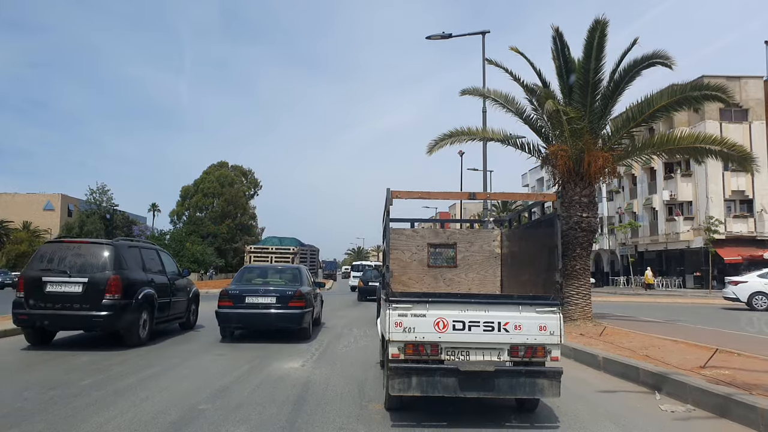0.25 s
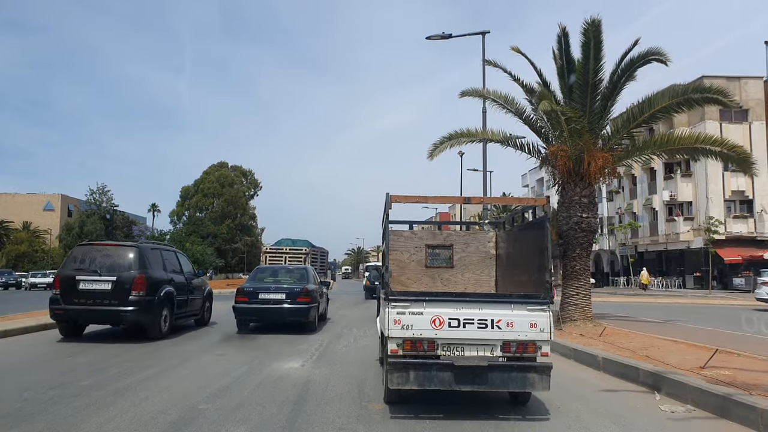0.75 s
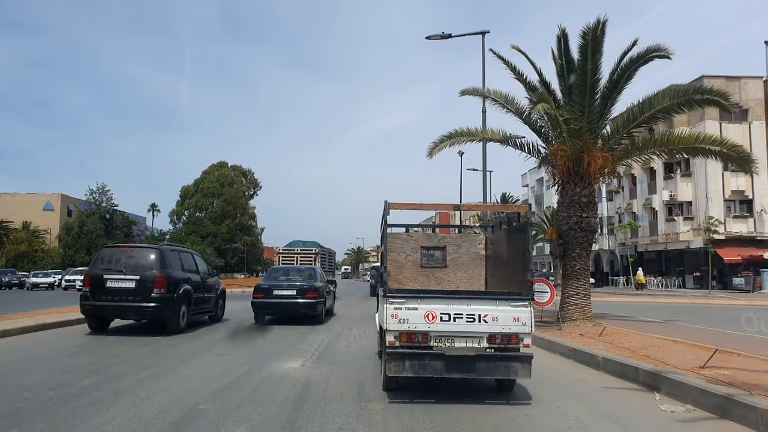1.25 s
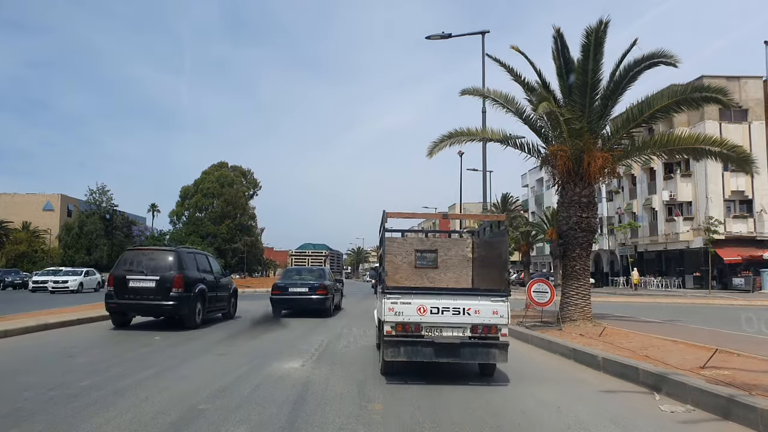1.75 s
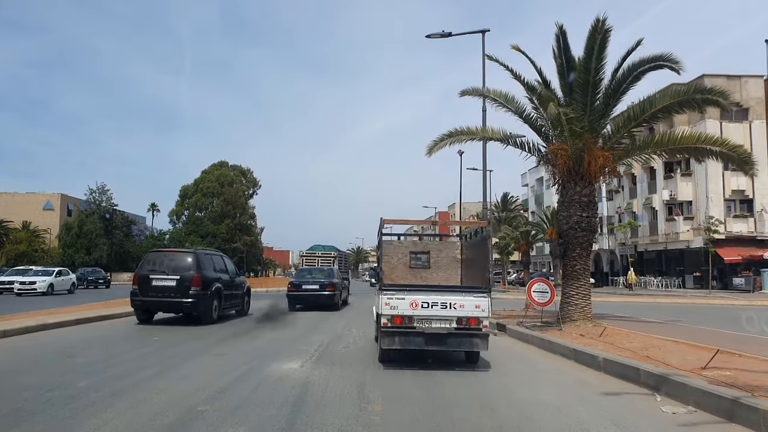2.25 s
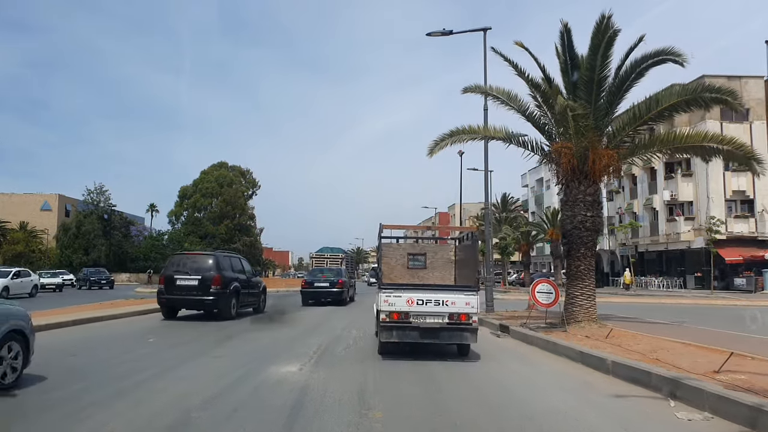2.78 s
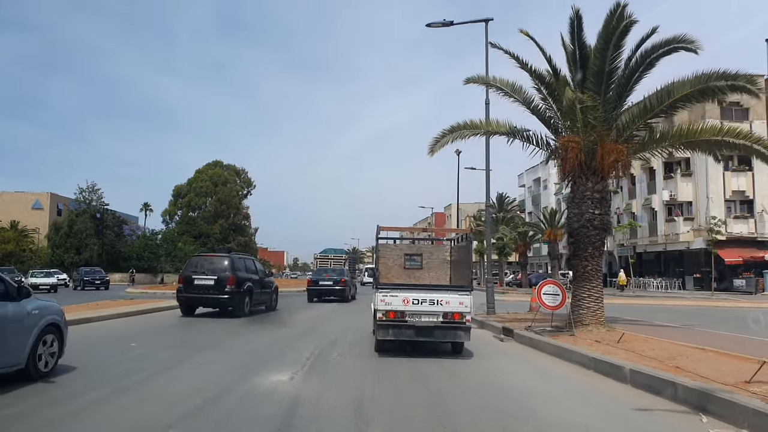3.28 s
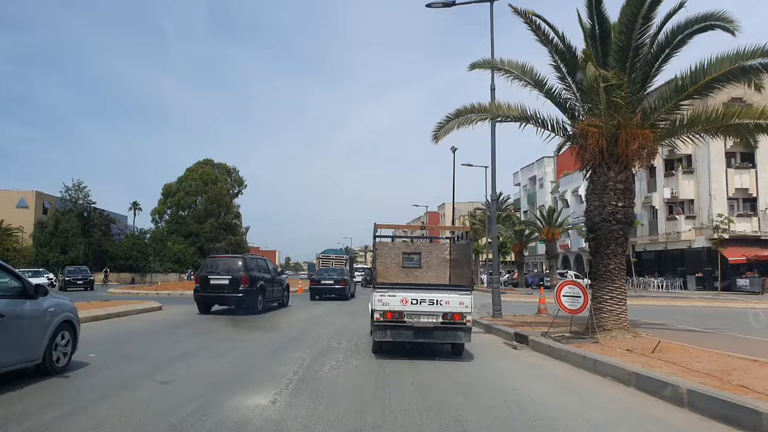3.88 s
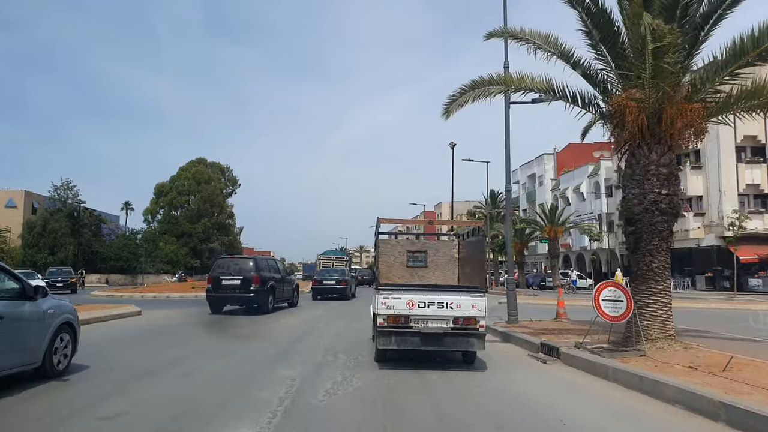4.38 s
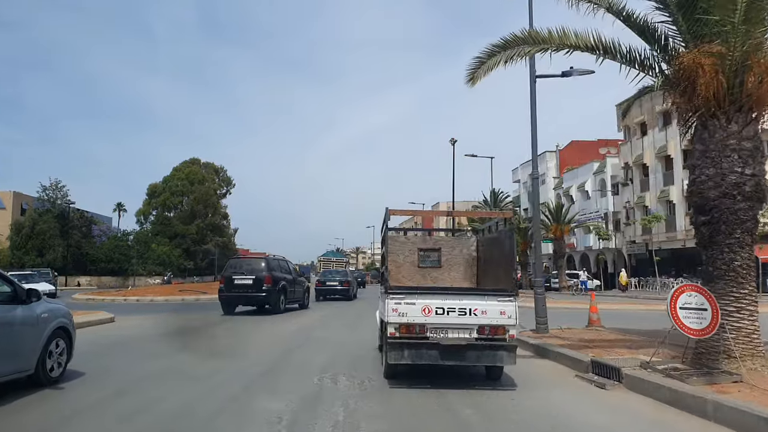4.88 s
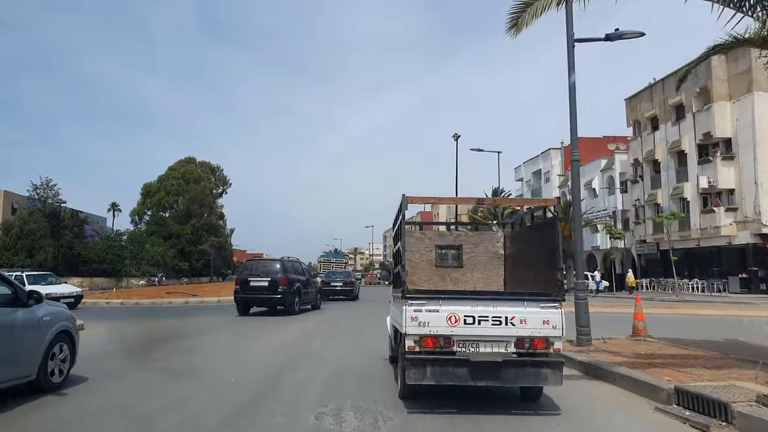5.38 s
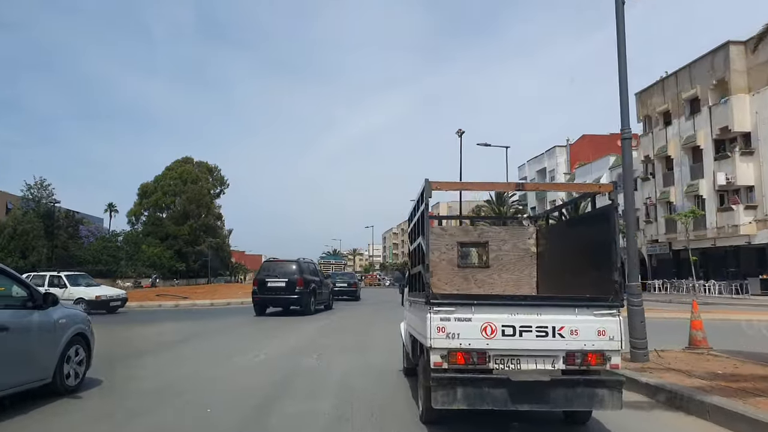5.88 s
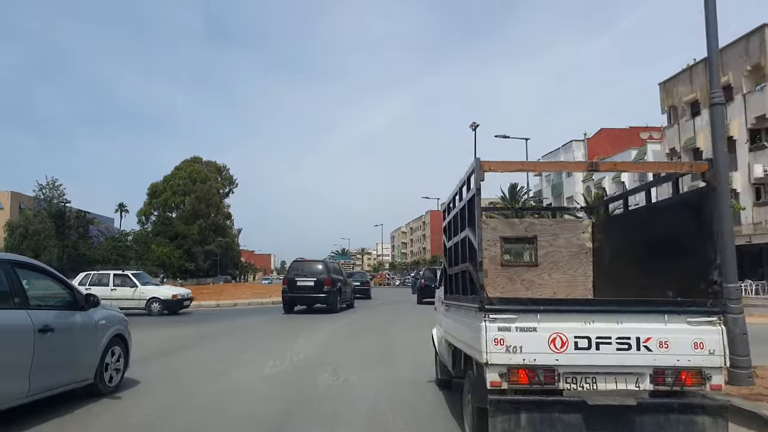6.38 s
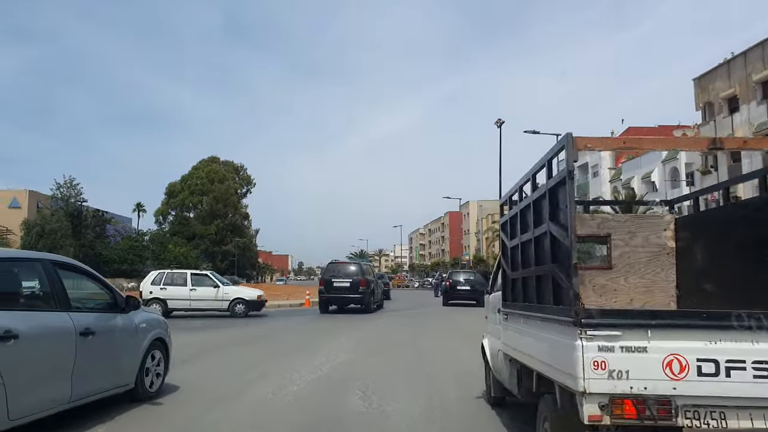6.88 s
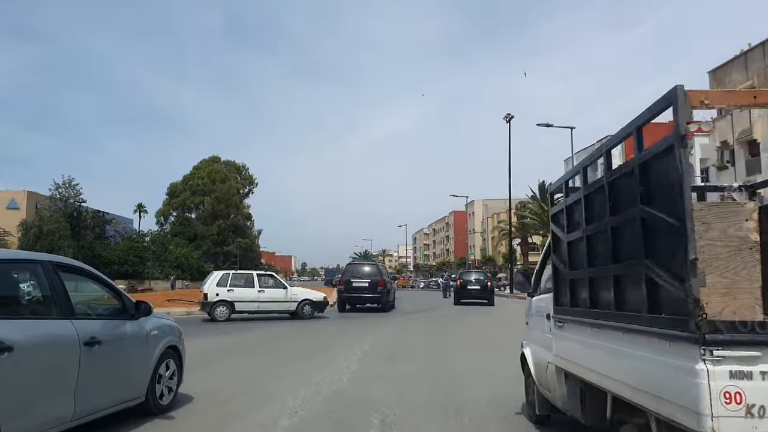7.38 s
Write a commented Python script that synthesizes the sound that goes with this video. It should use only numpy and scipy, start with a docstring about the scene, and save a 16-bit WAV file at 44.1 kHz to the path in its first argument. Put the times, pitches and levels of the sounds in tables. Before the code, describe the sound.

Heard inside a car in slow traffic: it idles while a neighbouring car and a truck throb alongside. A sudden burst of compressed air hisses nearby, then the car's engine climbs and pulls away with a low drone. Midway the left side abruptly turns thin. Bumps thud under the wheels, the cabin knocks and chirps, and very high brake squeals appear as it slows. Two phone microphone ports, left mostly louder and brighter.

```python
"""A car's engine waits, pulls away and brakes again in slow city traffic, heard in the cabin on a phone's two ports.
Sums of firing orders make this engine and the two alongside; sines ring the knocks and the bumps under the wheels.
Resonated noise makes very high brake squeals, squeaks, rubbing, chirps and whines; thin clean tones are sines.
Noise under moving spectra makes traffic wash, road rumble, tyre hiss and one nearby burst of compressed air.
Part way through, traffic, engines, whines and thin tones abruptly lose bass and mids at the left port."""
import sys
import numpy as np
from scipy import signal
from scipy.fft import rfft, irfft
from scipy.io import wavfile
from scipy.ndimage import uniform_filter1d

SR = 44100
rng = np.random.default_rng(int(sys.argv[2]) if len(sys.argv) > 2 else 0)


def dump_mix(stems):
    """Bounce the given channels to the path in sys.argv[1] as a 16-bit WAV at rate SR."""
    frames = np.atleast_2d(stems).T  # one column per channel
    limited = np.clip(frames, -1, 1)  # hard clip at full scale
    pcm = np.round(limited * 32767).astype(np.int16)
    wavfile.write(sys.argv[1], SR, pcm)


N = 337358  # samples
EDGE_HZ = 15700  # upper band limit

# Bumps under the wheels. Each row: start in seconds, level in dB, pitch in Hz.
BUMPS = [(4.506, -34, 69), (4.598, -34, 64.6), (4.777, -24, 64), (4.848, -17.5, 65.7), (4.919, -21.5, 85),
         (4.979, -25.5, 77), (5.061, -21.5, 79.6), (5.119, -20, 83.6), (5.22, -21.5, 83.3),
         (5.271, -23.5, 75.3), (5.335, -23, 69), (5.478, -18.5, 69.4), (5.629, -23, 80.4),
         (5.695, -30.5, 68), (5.943, -24, 84.7), (6.064, -17.5, 81), (6.249, -20, 82.3), (6.375, -20.5, 79),
         (6.598, -22, 98), (6.746, -16.5, 88), (6.863, -24, 78), (6.963, -29.5, 80.7), (7.086, -22, 82.6),
         (7.202, -20.5, 70), (7.318, -20, 91.5), (7.395, -27.5, 64), (7.47, -22.5, 77)]


def amp(db):
    """Decibels to gain."""
    return 10 ** (np.asarray(db) / 20)


def evened(x):
    """Scales to rms 1."""
    return x / np.sqrt(np.mean(x ** 2) + 1e-20)


def read(points, hz):
    """Reads every column of a spectrum table on a log-frequency axis."""
    table_hz, *columns = np.transpose(points)
    return np.array([np.interp(np.log(hz + 1), np.log(table_hz + 1), column) for column in columns])


def shaped(points, hz, lift_db=0):
    """Power spectrum at each port, mean 1 over both."""
    power = amp(read(points, hz) + lift_db) ** 2
    return (power / power.mean())[..., None]


def played(rows):
    """First sample of a curve table, and its columns at every sample."""
    s, *columns = np.transpose(rows)
    first = round(s[0] * SR)
    t = np.arange(first, min(round(s[-1] * SR), N)) / SR
    return first, [np.interp(t, s, column) for column in columns]


def arch(start, length, peak_db, ends_db):
    """First sample, progress 0-1, and a level that lies ends_db under its peak at both ends."""
    progress = np.linspace(0, 1, round(min(length, N / SR - start) * SR))
    return round(start * SR), progress, peak_db - ends_db * (2 * progress - 1) ** 2


def add(mix, at, sound):
    """Mixes a two-channel sound in from sample at."""
    mix[:, at:at + sound.shape[1]] += sound[:, :N - at]


def panned(x, pan_db):
    """Splits a sound over the ports; pan_db is left minus right."""
    return np.array([x * amp(pan_db / 2), x / amp(pan_db / 2)])


def wander(count, width_s):
    """Slow random drift of rms 1: noise through two running means."""
    width = int(width_s * SR)
    once = uniform_filter1d(rng.standard_normal(count), width)
    return evened(uniform_filter1d(once, width))


def resonate(x, hz, width):
    """A resonance at a fixed or moving pitch: shifts hz down to zero, smooths twice, shifts back."""
    turn = np.exp(2j * np.pi * np.cumsum(hz * np.ones(len(x))) / SR)
    r = np.exp(-np.pi * width / SR)
    smooth = signal.lfilter([(1 - r) ** 2], [1, -2 * r, r * r], x / turn)
    return 2 * (turn * smooth).real


def pair(count, same):
    """White noise at two ports, partly alike."""
    a, b = rng.standard_normal((2, count))
    return np.array([a, same * a + np.sqrt(1 - same ** 2) * b])


def whistle(hz, db, pan_db, width_hz, flutter_db, overtone_db=None):
    """Irregular slips ring a narrow resonance: a fuzzy, fluttering whistle, only partly alike at the ports."""
    slips = pair(len(db), 0.51)
    ring = np.array([evened(resonate(x, hz, width_hz)) for x in slips])
    if overtone_db is not None:
        high_hz = np.minimum(2 * hz, EDGE_HZ)
        overtone = np.array([evened(resonate(x, high_hz, 2 * width_hz)) for x in slips])
        ring += amp(overtone_db) * (2 * hz < EDGE_HZ) * overtone  # silent above the band limit
    shape = amp(db + flutter_db * wander(len(db), 0.0071)) * signal.windows.tukey(len(db), .1)
    return ring * panned(shape, pan_db)


def engine(rows, orders, uneven_db, uneven_s):
    """Sines at orders of the firing rate; uneven burning makes each one flutter."""
    at, (hz, load_db) = played(rows)
    turns = np.cumsum(hz) / SR
    out = 0
    for k, left_db, right_db in orders:
        order = amp(uneven_db * wander(len(hz), uneven_s)) * np.sin(2 * np.pi * k * turns)
        out = out + amp([[left_db], [right_db]]) * order
    fade_out = np.minimum(np.arange(len(hz), 0, -1) / (.1 * SR), 1)
    return at, np.sqrt(2) * amp(load_db) * out * fade_out


def own_engine():
    """The cabin's own engine, its firing rate rising to pull away and falling again."""
    # Each row: time in seconds, firing rate in Hz, load in dB.
    run = [(0, 27.5, -42), (1, 27, -34), (1.95, 27, -36.5), (2.1, 29, -26), (2.25, 41, -27.5),
           (2.35, 54, -30), (2.48, 59.5, -31), (2.68, 60.5, -23.5), (2.93, 60.5, -25.5), (3.1, 57.5, -26.5),
           (3.77, 58, -27), (3.92, 59, -27), (4.17, 58.5, -24.5), (4.35, 57.5, -27), (4.65, 61, -30),
           (4.85, 57, -28.5), (5.2, 40.5, -34.5), (5.6, 29.5, -29), (7.65, 25.5, -40)]
    # Each row: multiple of the firing rate, left and right level in dB relative to the load.
    orders = [(.5, -26, -43), (1, 0.5, -5.5), (2, -16, -8), (2.5, -24, -33), (3, -5.5, -21.5),
              (3.5, -17, -39.5), (4, -12, -28), (6, -24, -36.5), (9.5, -33, -39.5)]
    return engine(run, orders, uneven_db=0.28, uneven_s=0.068)


def left_car():
    """An engine alongside, stronger at the left port, that beats against the own engine."""
    # Each row: time in seconds, firing rate in Hz, load in dB.
    run = [(0, 57, -23), (.2, 55.6, -19.5), (.5, 53.5, -30), (.9, 50.47, -24.5), (1.3, 51.3, -20),
           (1.55, 50.9, -25), (1.8, 52.6, -15), (2.1, 52.53, -21), (2.4, 53.31, -16.5), (3, 53.42, -21),
           (3.2, 54.26, -16.5), (3.5, 54.62, -22), (3.75, 53.18, -17.5), (4.3, 55.01, -21),
           (4.6, 57.5, -60.5)]
    # Each row: multiple of the firing rate, left and right level in dB relative to the load.
    orders = [(1, 0.5, -15.5), (2, -16, -31.5)]
    return engine(run, orders, uneven_db=1.72, uneven_s=0.05)


def truck():
    """A truck engine alongside, with many orders and a slower flutter."""
    # Each row: time in seconds, firing rate in Hz, load in dB.
    run = [(0, 38.44, -38.5), (.45, 39.04, -35.5), (.9, 39.43, -36), (1.4, 40.36, -37.5),
           (1.75, 39.44, -36), (2.1, 38.9, -31.5), (2.35, 37.97, -40.5), (2.7, 37.54, -46)]
    # Each row: multiple of the firing rate, left and right level in dB relative to the load.
    orders = [(2, -1, -15.5), (3, 2, -18), (4, -10.5, -17), (5, -0.5, -19), (6, -2.5, -22), (7, -20.5, -31),
              (8, -11.5, -30), (9, -14.5, -36), (10, -14.5, -32), (11, -19.5, -29), (12, -12.5, -25)]
    return engine(run, orders, uneven_db=2.5, uneven_s=0.24)


def squeal(disc, start, held, catch_db, last_db, fade):
    """Pad and disc slip against each other and excite one disc mode."""
    hz, width_hz, pan_db, flutter_db = disc
    catch_s, gone_db = 0.019, 35  # the pad bites this fast; it rises and fades by gone_db
    at, (db,) = played([(start, catch_db - gone_db),
                        (start + catch_s, catch_db),
                        (start + held, last_db),
                        (start + held + gone_db / fade, last_db - gone_db)])
    db = db[max(-at, 0):]  # drop what lies before time zero
    db = db + 1.5 * wander(len(db), 0.035)  # stutter
    return max(at, 0), whistle(hz, db, pan_db, width_hz, flutter_db)


def knock(s, db, hz, t60, pan_db):
    """A dying ring that starts within a cycle or two, roughened by rattle."""
    t = np.arange(12000) / SR
    rattle = evened(resonate(rng.standard_normal(len(t)), hz, 0.4 * hz))
    decay = amp(db - 60 * t / t60)
    onset = 1 - np.exp(-t * hz / 0.79)
    ring = decay * onset * (np.sin(2 * np.pi * hz * t) + 0.33 * rattle)
    return round(s * SR), panned(ring, pan_db)


def bump(s, db, hz):
    """A low knock under the wheels, nearly even at the two ports."""
    return knock(s, db, hz, t60=0.22, pan_db=1.5)


def squeak(rows):
    """A rough, broken whistle with an overtone, whose pitch wobbles around its slide."""
    at, (hz, db) = played(rows)
    hz = hz * (1 + .025 * wander(len(hz), 0.01))
    return at, whistle(hz, db, pan_db=9, width_hz=.055 * hz.mean(), flutter_db=2.5, overtone_db=-5)


def rub(start, length, level_db, pan_db):
    """Grainy slips ring a few broad resonances that shift unevenly."""
    # Each row: resonance in Hz before it shifts, width in Hz, relative level in dB.
    ring_rows = [(2670, 300, 0), (2900, 230, -4.5), (4300, 590, -8.5)]
    at, progress, db = arch(start, length, level_db, ends_db=9)
    slips = rng.standard_normal(len(db)) * amp(2.5 * wander(len(db), 0.003))
    rise = 1 + 0.04 * (progress - .5) + 0.025 * wander(len(db), .04)
    rings = sum(amp(ring_db) * evened(resonate(slips, hz * rise, width)) for hz, width, ring_db in ring_rows)
    return at, panned(amp(db) * rings * signal.windows.tukey(len(db), .3), pan_db)


def whine(start, length, first_hz, last_hz, width_hz, peak_db, pan_db):
    """A soft fuzzy whistle that swells, fades and may drift in pitch."""
    at, progress, db = arch(start, length, peak_db, ends_db=4)
    hz = first_hz + (last_hz - first_hz) * progress
    return at, whistle(hz, db, pan_db, width_hz, flutter_db=1.5)


def chirp(s, db, hz):
    """A short faint chirp of cabin trim: noise in one resonance at a steady pitch."""
    return whine(s, .035, hz, hz, width_hz=260, peak_db=db, pan_db=5)


def thin_tone(start, length, first_hz, final_hz, settle_s, peak_db, pan_db):
    """A sine of slightly wavering level that settles on its pitch, as gears whine or a brake sings."""
    at, progress, db = arch(start, length, peak_db, ends_db=4)
    hz = final_hz + (first_hz - final_hz) * np.exp(-progress * length / settle_s)
    sine = np.sqrt(2) * np.sin(2 * np.pi * np.cumsum(hz) / SR)
    sine = sine * signal.windows.tukey(len(progress), .1)
    return at, panned(sine * amp(db + 2.0 * wander(len(progress), .03)), pan_db)


def air(t):
    """Power of a burst of compressed air nearby: sudden, held, dying, with a weaker lingering leak."""
    start_s, held_s, shut_s = 1.575, 0.12, 2.35  # the valve shuts at shut_s
    rise, fade, leak_fade = 310, 82, 6.1  # dB per second
    since = np.maximum(t - start_s - held_s, 0)
    burst = amp(-52 - fade * since) ** 2
    leak = amp(-60 - leak_fade * since - fade * np.maximum(t - shut_s, 0)) ** 2
    return (burst + leak) / amp(rise * np.maximum(start_s - t, 0)) ** 2


def tyres(t):
    """Power of the tyre hiss: a far bed, and vehicles that swell and fade past the window."""
    # Each row: reference time in seconds, level there in dB, swell before it and fade after it
    # in dB per second (a negative fade goes on rising).
    passes = [(0, -51.5, 30, 33), (.6, -55, 3, 5), (1.699, -45.5, 33, 19.5), (4.5, -58, 11, 8),
              (6.0, -72, 11, 7), (7.3, -47.5, 10, -3)]
    power = amp(-63) ** 2  # far bed
    for s, db, swell, fade in passes:
        drop_db = np.where(t < s, swell * (s - t), fade * (t - s))
        power = power + amp(db - drop_db) ** 2
    return power


def jolts(t):
    """How hard the bumps shake the body, around its mean from the first bump on."""
    jolt_s = 0.031
    shake = sum(amp(db) * np.exp(-((t - s - jolt_s / 2) / jolt_s) ** 2) for s, db, hz in BUMPS)
    shake = shake / shake.max()
    rolling = t > BUMPS[0][0]
    return shake - shake[rolling].mean() * rolling


def street():
    """Wash, hiss, air and rumble: noise under moving spectra with drifting patches, partly alike at the ports."""
    # Spectra at the two ports. Each row: frequency in Hz, left and right relative level in dB.
    wash_spectrum = [(25, -27.5, -37), (57.7, -14, -19.5), (133, -3.5, -15.5), (169, -8.5, -23.5),
                     (237, -11.5, -23), (342, -17.5, -28.5), (455, -15, -29), (760, -24, -39),
                     (1073, -26, -36), (1220, -32.5, -42.5), (1780, -34.5, -47), (2610, -38, -58),
                     (3800, -44.5, -66.5), (6540, -67, -84), (14000, -92.5, -100)]
    hiss_spectrum = [(300, -41.5, -53), (676, -20, -42.5), (1340, -27.5, -38), (2000, -40.5, -45.5),
                     (3950, -38, -58), (5800, -44, -65), (7490, -53, -78), (8490, -43.5, -75.5),
                     (9700, -47.5, -58), (13000, -56.5, -60.5), (15500, -65, -81)]
    air_spectrum = [(1492, -36.5, -59.5), (2800, -37.5, -53.5), (4570, -39.5, -56), (6440, -42.5, -64.5),
                    (7300, -57, -74), (8400, -41, -67.5), (10200, -41, -47), (12600, -49, -59),
                    (15600, -49, -79)]
    rumble_spectrum = [(20.5, 13.5, -7.5), (41.7, 6, 6.5), (59, 12, 10), (86.8, 15.5, 13.5),
                       (111, 12.5, -5.5), (149, -1, -3), (203, -20.5, -30.5), (400, -43.5, -61.5),
                       (1500, -110, -110)]
    # Cabin resonances. Each row: frequency in Hz, width in Hz, lift in dB.
    panels = [(227, 133, 4.5), (356.3, 22.6, 5), (451.5, 7.5, 3), (653, 40, 2.5), (813, 9.5, 8),
              (1251, 9.5, 9), (1660.5, 11, 4), (2180, 150, 0), (2420, 270, 0)]
    # Likeness of the ports. Each row: frequency in Hz, left-right likeness from 0 to 1.
    likeness = [(50, 0.9), (100, 0.8), (200, 0.8), (450, 0.82), (1200, 0.48), (2000, 0.25), (5000, 0.16)]
    # Traffic wash before bass evening and shaking. Each row: time in seconds, level in dB.
    wash_level = [(0, -31.5), (.35, -34.5), (1.2, -34.5), (1.6, -29), (1.95, -31), (2.6, -36.5),
                  (4.1, -36.5), (4.6, -34.5), (5.45, -38.5), (6.2, -34), (7.1, -36.5), (7.5, -32),
                  (7.65, -35.5)]
    # Road rumble before lumps and jolts, mostly weak while the car waits. Each row: time in seconds, level in dB.
    rumble_level = [(0, -22.5), (.3, -41), (1.0, -34.5), (1.85, -53.5), (2.151, -28.5), (2.8, -42),
                    (3.5, -34), (4.25, -25), (4.55, -28), (4.9, -28.5), (5.5, -26), (6.05, -21),
                    (6.35, -30.5), (6.7, -26), (7.15, -25.5), (7.5, -20), (7.65, -29.5)]
    bass_follows, bass_hz = 0.24, 224  # well under bass_hz the wash follows its swells only by this share
    lag_s = 0.00041  # the shared sound reaches the right port later

    hz, t, (left, other) = signal.stft(rng.standard_normal((2, N)), SR, nperseg=2048, noverlap=1536)
    rows_hz = hz[:, None]
    wash = amp(np.interp(t, *np.transpose(wash_level))) ** 2
    rumble = amp(np.interp(t, *np.transpose(rumble_level))) ** 2
    wash = wash * (wash.mean() / wash) ** ((1 - bass_follows) / (1 + (rows_hz / bass_hz) ** 4))

    # Rumble and lower wash swell and sink in random lumps throughout; the bumps jolt both too.
    lumps = evened(uniform_filter1d(rng.standard_normal(len(t)), size=3))
    jolt = jolts(t)
    wash = wash * amp(1.8 * lumps / (1 + (rows_hz / 300) ** 2)) ** 2
    wash = wash * amp(5.5 * jolt / (1 + (rows_hz / 700) ** 2)) ** 2
    rumble = rumble * amp(3.68 * lumps + 8.5 * jolt) ** 2

    panels_db = sum(db / (1 + (2 * (hz - f) / width) ** 2) for f, width, db in panels)
    power = shaped(wash_spectrum, hz, panels_db) * wash
    power = power + shaped(hiss_spectrum, hz, panels_db) * tyres(t)
    power = power + shaped(air_spectrum, hz, panels_db) * air(t)
    power = power + shaped(rumble_spectrum, hz) * rumble

    patches = uniform_filter1d(rng.standard_normal(left.shape), size=30, axis=0)
    patches = evened(uniform_filter1d(patches, size=8, axis=1))
    same = read(likeness, hz)[0][:, None]
    lagged = left * np.exp(-2j * np.pi * rows_hz * lag_s)
    right = same * lagged + np.sqrt(1 - same ** 2) * other
    spectra = np.array([left, right]) * np.sqrt(power) * amp(0.9 * patches)
    return signal.istft(spectra, nperseg=2048, noverlap=1536)[1][:, :N]


def thinned(x):
    """The left port turns thin: bass and mids drop in a crossfade to a filtered copy within 23 ms."""
    # Each row: frequency in Hz, change at the left port in dB.
    thinning = [(30, -44), (55, -6), (90, -16), (250, -5.5), (700, -11), (1400, -7), (2800, -10),
                (3400, -4), (5000, -2.5)]
    start_s, turn_s = 4.2, 0.023
    gain = amp(read(thinning, np.fft.rfftfreq(N, 1 / SR))[0])
    thin = irfft(rfft(x[0]) * gain, N)
    share = np.clip((np.arange(N) / SR - start_s) / turn_s, 0, 1)
    return np.array([(1 - share) * x[0] + share * thin, x[1]])


def scene():
    """Traffic, engines, whines and tones pass the changing port; squeals, bumps and cabin noises join."""
    # Brake squeals. Each row: start in seconds, held in seconds, level in dB when it catches,
    # level in dB when it lets go, fade in dB per second.
    squeals = [(-.04, 0.072, -55, -60, 170), (.06, 0.072, -71, -56, 298.5), (5.17, 0.12, -80, -75, 251),
               (5.33, 0.49, -65, -57.5, 71), (5.94, .5, -90, -92, 151.5), (6.56, 0.6, -63, -66, 41),
               (6.902, .1, -69, -71.5, 116.5), (7.17, .12, -88, -80, 311), (7.31, .08, -79, -78, 170),
               (7.368, 0.11, -53.5, -50, 136)]
    # Disc modes, one for each squeal. Each row: pitch in Hz, width in Hz, left minus right in dB, flutter in dB.
    discs = [(11370, 70, 2, 2), (12320, 70, 6, 2), (12620, 150, 6, 3), (12860, 65, 6, 2.5),
             (14720, 70, 14, 3), (12120, 75, 4, 2.5), (11100, 40, 1, 2), (14290, 60, 12, 2),
             (14650, 60, 12, 2), (11990, 190, 4, 3)]
    # Sliding squeaks, one list each. Each row: time in seconds, pitch in Hz before wobble, level in dB.
    squeaks = [
        [(5.7, 4000, -84.5), (5.748, 4750, -66.5), (5.762, 6100, -71), (5.792, 6740, -71), (5.803, 8850, -68),
         (5.828, 8200, -70), (5.838, 9800, -67), (5.85, 10000, -77)],
        [(7.43, 6500, -74), (7.515, 7000, -74), (7.545, 6430, -69), (7.585, 5830, -69), (7.625, 5430, -64),
         (7.65, 5270, -68)],
    ]
    # Something rubs in the cabin. Each row: start in seconds, length in seconds, level in dB, left minus right in dB.
    rubs = [(5.068, 0.38, -67.5, 7), (5.8, 0.216, -67, 6)]
    # Cabin knocks. Each row: start in seconds, level in dB, pitch in Hz, 60 dB decay in seconds,
    # left minus right in dB.
    knocks = [(5.702, -53, 660, .5, 8), (5.702, -55, 1110, .12, 6), (5.714, -44, 314, .2, 5),
              (5.753, -32, 364, .047, 2), (5.754, -40, 1230, .016, 7), (5.863, -55, 1180, .08, 2),
              (5.892, -47, 420, .051, 4), (6.002, -42, 1235, .022, 6), (6.109, -50, 950, .064, 0),
              (6.158, -46, 590, .16, 5), (6.161, -53, 1220, .08, -1), (6.184, -47, 480, .13, 9),
              (6.215, -40, 393, .1, 1), (6.34, -51, 655, .087, 4), (7.388, -53.5, 1300, .03, 10),
              (7.485, -55, 1520, .05, 13)]
    # Chirps of trim in the cabin. Each row: start in seconds, level in dB, pitch in Hz.
    chirps = [(4.6, -66, 2300), (4.705, -68, 2170), (6.1, -70, 2860), (6.205, -61.5, 1750),
              (6.555, -64, 1720), (6.875, -60, 1960)]
    # Fuzzy whines and hums heard with the traffic. Each row: start in seconds, length in seconds,
    # first and last pitch in Hz, width in Hz, level in dB, left minus right in dB.
    whines = [(1.8, 1.75, 2200, 2154, 130, -67, 16.5), (2.9, 1.8, 625, 640, 50, -60, 11),
              (3.2, 1.3, 2880, 2810, 230, -71, 11.5), (3.7, 1.15, 8400, 8100, 450, -85, 21.5),
              (1.75, .5, 2850, 2650, 500, -65.5, 14), (1.56, .27, 4700, 4490, 650, -65, 17),
              (.8, .45, 252, 274, 7, -46, 8.5), (1.3, .45, 160, 160, 7, -43, 12),
              (1.35, .33, 368, 358, 8, -47.5, 14)]
    # Thin clean tones. Each row: start in seconds, length in seconds, first and final pitch in Hz,
    # settling time in seconds, level in dB, left minus right in dB.
    thin_tones = [(3.3, 1.2, 634, 642, .6, -58, 11), (3.2, 1.3, 975, 998, .6, -65, 6),
                  (6.98, .67, 5425, 5425, .5, -79, 13)]

    mix = street()
    for motor in (own_engine, left_car, truck):
        add(mix, *motor())
    for play, rows in ((whine, whines), (thin_tone, thin_tones)):
        for row in rows:
            add(mix, *play(*row))
    mix = thinned(mix)
    for disc, row in zip(discs, squeals):
        add(mix, *squeal(disc, *row))
    for rows in squeaks:
        add(mix, *squeak(rows))
    for play, rows in ((rub, rubs), (knock, knocks), (bump, BUMPS), (chirp, chirps)):
        for row in rows:
            add(mix, *play(*row))
    return mix


def record(dry):
    """Faint self-noise of each microphone port, then the band limit."""
    # Each row: frequency in Hz, left and right gain in dB on white noise of rms 1.
    self_noise = [(100.4, -83.5, -87.5), (6060, -79, -98), (9000, -89.5, -94), (12000, -100, -99),
                  (16000, -104, -103)]
    gain = amp(read(self_noise, np.fft.rfftfreq(N, 1 / SR)))
    noise = irfft(rfft(rng.standard_normal(dry.shape)) * gain, N)
    low_pass = signal.firwin(1023, EDGE_HZ, window=("kaiser", 9), fs=SR)
    return signal.oaconvolve(dry + noise, low_pass[None], "same")


dry = scene()
out = record(dry)
dump_mix(out)
```